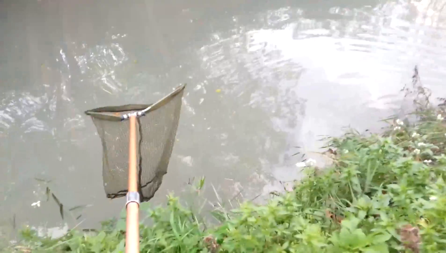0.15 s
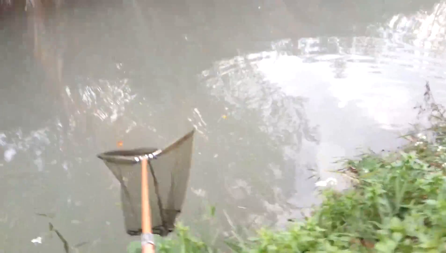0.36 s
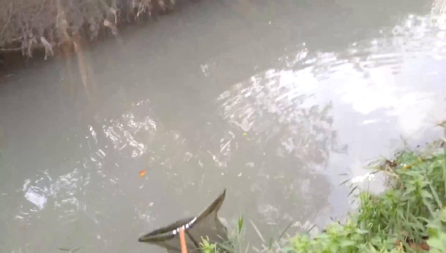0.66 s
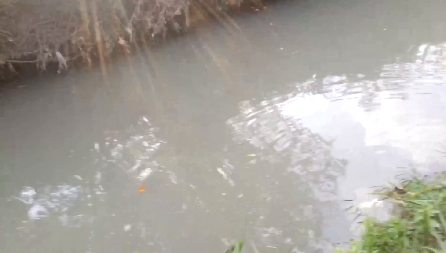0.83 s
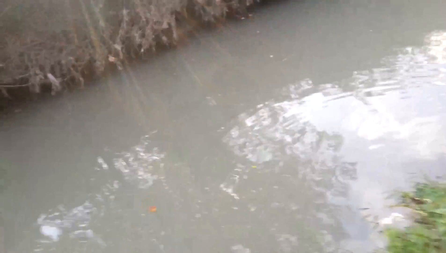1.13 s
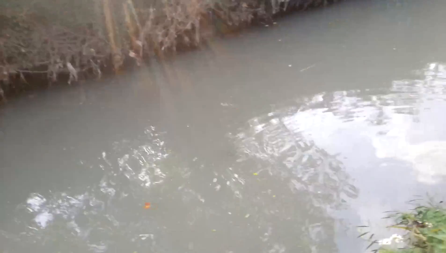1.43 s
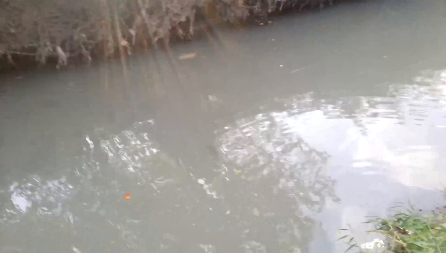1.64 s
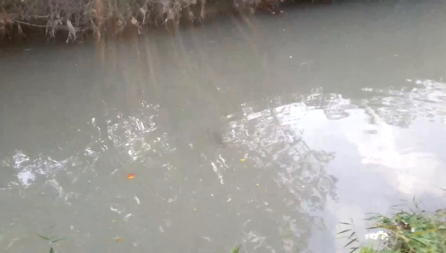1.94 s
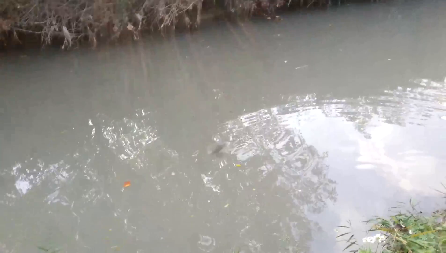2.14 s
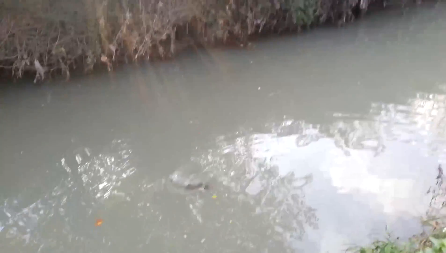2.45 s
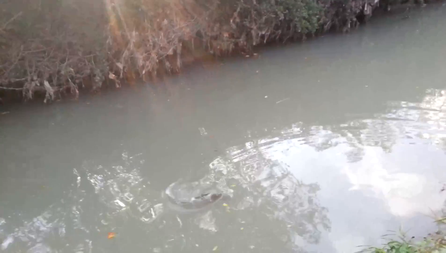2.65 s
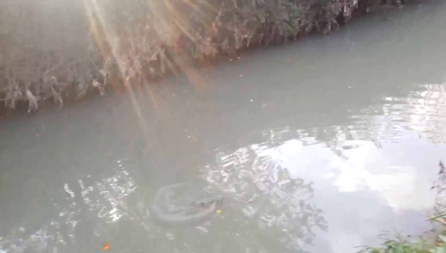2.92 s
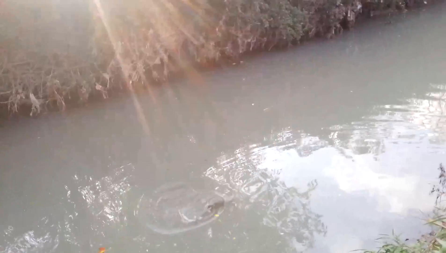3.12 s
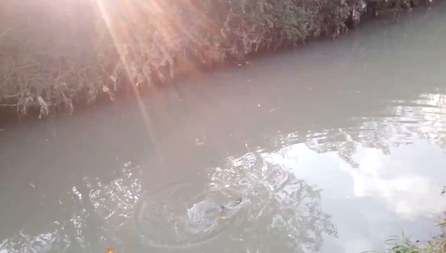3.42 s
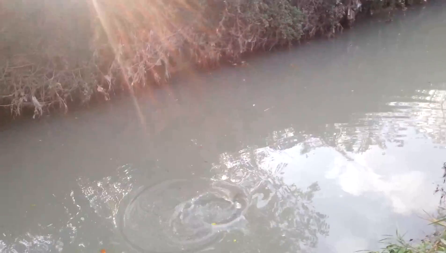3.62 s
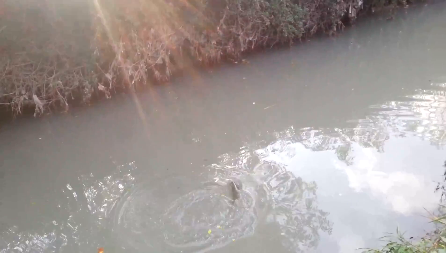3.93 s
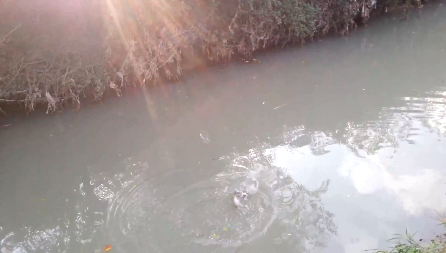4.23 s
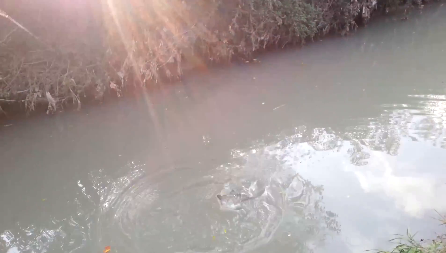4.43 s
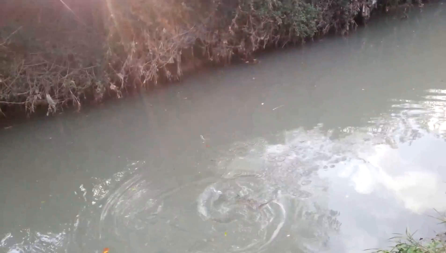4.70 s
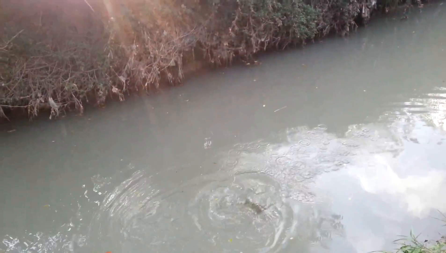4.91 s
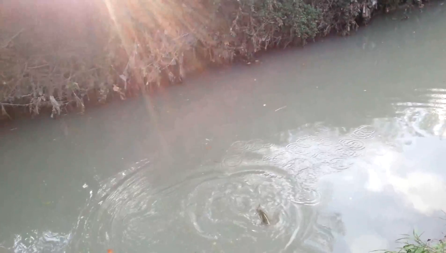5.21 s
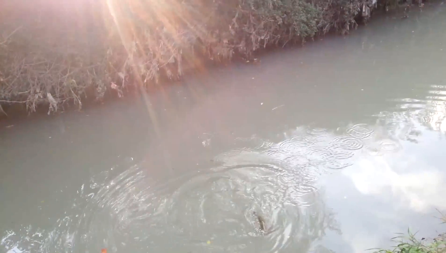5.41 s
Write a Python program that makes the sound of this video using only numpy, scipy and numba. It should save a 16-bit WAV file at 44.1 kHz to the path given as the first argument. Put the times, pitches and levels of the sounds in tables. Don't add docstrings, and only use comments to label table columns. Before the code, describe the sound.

Two sharp handle snaps and soft rustling on a canal bank, then a hooked fish thrashes at the surface with bubbly gurgles and hard splashes.

```python
import sys
import numpy as np
from scipy import signal
from scipy.fft import rfft, irfft, next_fast_len
from scipy.io import wavfile
from scipy.ndimage import uniform_filter1d
from numba import njit

SR = 44100
rng = np.random.default_rng(int(sys.argv[2]) if len(sys.argv) > 2 else 0)


def int16_out(signal):
    q = np.round(np.clip(np.atleast_2d(signal).T, -1, 1) * 32767)
    wavfile.write(sys.argv[1], SR, q.astype(np.int16))


def linear_from_db(decibels):
    return 10 ** (np.asarray(decibels, float) / 20)


N = 245195
PAD = next_fast_len(N, real=True)
FREQ = np.fft.rfftfreq(PAD, 1 / SR)
TIME = np.arange(N) / SR

# t left/s, t right/s
SNAP_TIMES = [
    (.35745, .35720),
    (.62693, .62717),
]


def fish():
    # t of the height/s, gurgle level/dB, spray level above the gurgle/dB
    lunges = [(2.39, -39, -7.5), (2.46, -39, -6), (2.57, -45.5, -3), (2.74, -52.5, -2.5),
              (2.85, -48.5, -16), (3.08, -48.5, -6.5), (3.22, -37, -10), (3.32, -38.5, -16.5),
              (3.41, -36, -9), (3.61, -35, -7.5), (3.7, -37, -17), (3.8, -50.5, -11), (4.05, -67, -12),
              (4.2, -50, 6.5), (4.25, -32.5, -13), (4.34, -37.5, -6.5), (4.42, -30.5, -18.5),
              (4.55, -32.5, -9), (4.68, -46, -7), (4.77, -46.5, -11)]
    gurgle_gain, spray_gain = surges(lunges, rise_db_s=182, fall_db_s=102, hold_s=0.0056)
    water = air_pockets() + slaps()
    water += gurgle_gain * gurgle() * linear_from_db(-4.0 + 1.0 * walk(60))
    fizz = [spray() for _ in range(3)]
    spray_gain = spray_gain * linear_from_db(2.0 * walk(70) - 1.0)
    water += 0.71 * spray_gain * fizz[0]
    return at_ports(water) + 1.324 * spray_gain * np.array(fizz[1:])


def air_pockets():
    # t/s, start f/Hz, end f/Hz, length/ms, peak level/dB
    climbs = [(2.404, 600, 800, 16, -33.5), (2.424, 850, 1250, 9, -39), (2.433, 399, 514, 29, -40),
              (2.4351, 522, 775, 63, -43.5), (2.756, 1320, 1420, 7, -30), (2.766, 1500, 1800, 9, -42),
              (3.1488, 987, 1270, 41, -36.5), (3.2027, 1200, 1415, 22, -32), (3.224, 1450, 2400, 17, -52),
              (3.3895, 494, 600, 8, -33), (3.3978, 740, 1080, 9, -27), (3.566, 563, 787, 25.6, -38),
              (3.7021, 511, 1366, 36, -39), (3.726, 1105, 1460, 14, -42), (3.76, 1700, 2380, 25, -40),
              (4.078, 1295, 1450, 14, -41), (4.091, 1460, 2340, 22, -45), (4.377, 1850, 1900, 6, -30.5),
              (4.415, 390, 910, 19, -39), (4.447, 566, 1443, 52, -36.5), (4.5257, 1670, 2000, 9.1, -22.5),
              (4.5437, 1080, 1380, 12.7, -30), (4.608, 1250, 3100, 6.5, -20), (4.975, 1850, 2250, 16, -53),
              (5.302, 1020, 1420, 9, -46), (5.344, 3250, 3200, 5, -50), (5.3249, 2220, 2300, 7.2, -35.5),
              (5.332, 2400, 3400, 7, -39.5)]
    # t/s, f/Hz, length/ms, peak level/dB
    plops = [(2.349, 1764, 10, -33.5), (2.3635, 1740, 5.9, -32), (2.3638, 1063, 10.6, -29.5),
             (2.4826, 1770, 5.7, -31), (2.5253, 1700, 9, -34), (2.5672, 674, 10, -35),
             (2.728, 1280, 8, -43), (2.843, 1200, 8.3, -48), (3.088, 1170, 56, -46),
             (3.1239, 1200, 12, -35), (3.2556, 1210, 8.2, -28.5), (3.2566, 447, 18, -38),
             (3.3285, 1150, 14, -40), (3.4113, 1840, 4.7, -29), (3.4132, 1200, 6.5, -31),
             (3.4242, 780, 9.6, -34), (3.465, 1660, 5.3, -27), (3.5769, 1290, 6.6, -33.5),
             (3.6228, 1710, 6.55, -21.5), (4.1826, 444, 12.2, -34), (4.2209, 1296, 4.6, -13.5),
             (4.2214, 573, 3.9, -15.5), (4.2267, 1263, 3.8, -11.5), (4.245, 740, 20, -35),
             (4.2803, 1820, 5.3, -24), (4.2846, 760, 13, -38), (4.5216, 1150, 16, -30),
             (4.5866, 1054, 13.5, -30.5), (4.7349, 1040, 1.5, -28), (4.808, 1055, 12, -42),
             (5.2781, 975, 12.4, -39.5)]
    # t/s, f/Hz, peak level/dB
    pings = [(2.4853, 2720, -33), (2.5617, 2290, -35), (2.605, 2040, -33), (3.1618, 2110, -28),
             (3.162, 2840, -26), (3.1898, 2930, -28), (3.506, 2350, -20), (3.515, 3260, -18.5),
             (3.5174, 1900, -27.5), (3.5365, 2230, -38.5), (3.6097, 2620, -20), (3.644, 2100, -26),
             (3.722, 2366, -32), (4.174, 2200, -32), (4.1874, 2920, -22), (4.21, 3240, -16),
             (4.2112, 2070, -23), (4.2655, 2200, -27), (4.328, 3370, -31), (3.274, 3270, -37),
             (3.279, 2270, -37), (3.294, 2800, -42), (3.323, 2110, -41), (3.123, 2920, -41),
             (3.136, 2800, -41), (3.235, 2280, -46), (4.362, 2620, -42), (4.341, 2400, -35),
             (4.45, 3100, -24), (4.4454, 2860, -27.5), (4.4767, 2900, -24.5), (4.4927, 2220, -25),
             (4.5237, 3180, -21), (4.5266, 2280, -13), (4.5364, 2720, -13.5), (4.6425, 2170, -32.5),
             (4.6092, 1960, -24), (4.662, 2270, -34), (4.759, 3220, -29)]
    # t/s, start f/Hz, end f/Hz, length/ms, peak
    # level/dB
    further_pockets = [(2.3519, 980, 940, 4.6, -33), (2.585, 960, 1360, 14.5, -44), (2.927, 2050, 1850, 10, -41),
                       (2.65, 1080, 1230, 40, -48), (2.855, 700, 720, 18, -47), (2.805, 1260, 1230, 23, -45.5),
                       (3.05, 2000, 3000, 9.7, -40), (2.953, 950, 1200, 11, -47), (3.262, 1750, 2200, 9, -35.5),
                       (3.218, 880, 1100, 14, -37), (3.327, 600, 700, 11.5, -38), (3.345, 1050, 1250, 8, -38),
                       (3.36, 1700, 1900, 6, -36), (3.6148, 647, 987, 26, -44), (3.7934, 1900, 1960, 9.7, -40),
                       (4.058, 910, 1200, 16, -48), (4.144, 1200, 2400, 7.5, -38), (4.1702, 1840, 1830, 7, -32),
                       (4.2875, 1110, 1150, 4, -26.5), (4.261, 1560, 2240, 11.4, -30.5),
                       (3.535, 1970, 2570, 8.8, -38), (4.181, 2800, 3180, 8, -25), (4.5365, 3200, 3430, 4, -24)]
    # t/s, start f/Hz, end f/Hz, length/ms, peak level/dB
    churn = [(2.384, 1900, 1950, 6.3, -35), (2.401, 2800, 2820, 5.8, -40), (2.448, 1400, 1450, 4.7, -40),
             (2.449, 2000, 2050, 5.5, -38), (2.468, 1800, 1860, 4.5, -40), (3.406, 2270, 2350, 4.4, -32),
             (3.455, 1700, 1750, 6.9, -45), (3.528, 2050, 2080, 6, -36), (3.572, 1800, 1800, 5.7, -34),
             (3.58, 2090, 2150, 7.5, -36), (3.582, 704, 990, 16, -35), (3.828, 1750, 1700, 7.8, -41.5),
             (3.832, 1150, 1100, 7.6, -50), (3.943, 2120, 2080, 8.1, -49), (3.971, 1150, 1130, 8.9, -46),
             (4.06, 2150, 2150, 6.5, -45), (4.329, 2000, 1970, 8.1, -35), (4.349, 1310, 1350, 8, -30),
             (4.365, 1200, 1250, 6, -30), (4.375, 267, 400, 40.6, -45), (4.25, 328, 380, 22, -43),
             (4.3925, 2200, 2230, 3.3, -30), (4.411, 2140, 2480, 5, -34), (4.421, 2190, 2270, 8, -32.5),
             (4.502, 1550, 1400, 3.8, -33), (4.508, 977, 1090, 10.4, -33.5), (4.552, 2400, 2500, 3.7, -29),
             (4.562, 2300, 2350, 5.3, -30), (4.569, 1110, 1150, 4.6, -28.5), (4.603, 2400, 2450, 3.3, -27),
             (4.624, 1800, 1850, 7.5, -34), (4.298, 1150, 1290, 16, -38), (4.316, 1090, 1300, 5.1, -35)]
    # t/s, peak level/dB, f/Hz
    spits = [(2.356, -33, 3700), (2.3846, -41, 5260), (2.509, -37, 4900), (2.583, -44, 4800),
             (2.629, -41, 3180), (3.123, -39, 3780), (3.1793, -35, 4320), (3.214, -32.5, 4450),
             (3.2722, -31.5, 4660), (3.3195, -42, 4380), (3.3415, -37, 5800), (3.415, -31, 4420),
             (3.415, -33, 5600), (3.4205, -35, 5400), (3.421, -35, 4470), (3.492, -37, 2900),
             (3.5146, -41, 4530), (3.5918, -28.5, 4520), (3.6133, -37, 4400), (3.646, -26, 4530),
             (3.797, -46, 2800), (4.185, -27, 4430), (4.21, -29, 3830), (4.381, -30.5, 3300),
             (4.4385, -35, 3500), (4.5265, -27, 6740), (4.5351, -19, 4550), (4.587, -23, 3920),
             (4.604, -31, 4360), (4.672, -34.5, 2880)]

    pockets = list(climbs) + list(further_pockets) + list(churn)
    pockets += [(s, hz, hz, ms, db) for s, hz, ms, db in plops]
    for s, hz, db in pings:
        ms = 1000 * 10.9 / hz * linear_from_db(0.51 * (-28 - db))
        pockets.append((s, hz, hz, ms, db))
    spit_cycles = 12
    pockets += [(s, hz, hz, 1000 * spit_cycles / hz, db) for s, db, hz in spits]

    out = np.zeros(N)
    for s, hz, end_hz, ms, db in pockets:
        wobble = rng.standard_normal(60)
        if end_hz < 1.12 * hz:
            note = linear_from_db(0.5) * bubble(hz, end_hz, ms, wobble, top=0.1, fall_db=8.5, over=2.5)
        else:
            note = bubble(hz, end_hz, ms, wobble)
        add(out, s, linear_from_db(db) * note)
    return out


def bubble(hz, end_hz, ms, wobble, top=0.18, fall_db=5.0, over=1.2):
    u = np.arange(int(over * ms * SR / 1000)) / (ms * SR / 1000)
    swell = np.sin(np.pi / 2 * np.minimum(u / top, 1)) ** 0.5
    fall = linear_from_db(-fall_db * np.maximum(u - top, 0) / (1 - top))
    fall = fall * np.minimum(8 * (over - u), 1)
    shake = np.interp(np.arange(len(u)), 100 * np.arange(len(wobble)), wobble)
    pitch = hz * (end_hz / hz) ** (np.minimum(u, 1.1) ** 1.4) * (1 + 0.022 * shake)
    return swell * fall * linear_from_db(2.6 * shake[::-1]) * np.sin(2 * np.pi * np.cumsum(pitch) / SR)


def slaps():
    # t/s, peak level/dB, centre f/Hz
    fin_slaps = [(2.426, -26, 2600), (3.1617, -14.5, 3130), (3.5149, -13, 3500), (4.2102, -20, 2800),
                 (4.2197, -38, 3500), (4.5244, -30, 3500), (3.1624, -16.5, 12900), (3.5117, -23, 9000),
                 (3.2745, -32, 6500), (4.233, -24, 1700), (4.236, -19, 1500)]
    # t/s, peak level/dB, centre f/Hz
    tail_strikes = [
        (3.2572, -14, 1300),
        (4.2214, -2, 1300),
        (4.5258, -6, 2300),
        (3.1608, -24, 12000),
        (4.5872, -7, 2800),
        (4.3925, -16, 2200),
        (4.411, -19, 2300),
        (3.1487, -24, 1500),
        (3.3185, -33, 1800),
    ]
    out = np.zeros(N)
    for hits, fade, foam in [(fin_slaps, 60.0, 1.0), (tail_strikes, 22.0, 0.3)]:
        for s, db, hz in hits:
            burst = foam * rng.standard_normal(400) * np.exp(-np.arange(400) / fade)
            burst[0] = 2.9
            edges_hz = [0.5 * hz, min(2.1 * hz, 16000)]
            band = signal.butter(3, edges_hz, "band", fs=SR, output="sos")
            crack = signal.sosfilt(band, burst)
            add(out, s, linear_from_db(db - 7.5) * crack / abs(crack).max())
    return out


def gurgle(count=5000):
    # f/Hz, level/dB
    bubble_sizes = [(150, -40), (380, -15.5), (700, -8), (1200, -1.5), (1800, 0), (2800, -1.5), (4000, 1.5),
                    (7000, 1)]
    when, small, cycles, glide, loud = rng.random((count, 5)).T
    start = (SR * (2.25 + 2.65 * when)).astype(np.int64)
    size = linear_from_db(-(3 + small) * np.log(loud + 0.03) + 5 * small)
    hz = 380 * 8.91 ** small
    bubbles = swarm(start, hz, 2.0 + 15.0 * cycles ** 1.72, 0.4 * glide ** 2.17, size)
    return colour(bubbles, bubble_sizes) * np.sqrt(2.65 * SR / N)


def spray():
    # f/Hz, level per Hz/dB
    spray_colour = [(900, -28), (2200, 6.5), (3500, 6.5), (4800, 2.5), (6500, -2), (9000, -3.5),
                    (12500, -9), (15000, -16)]
    drops = rng.standard_normal(N) + crackle(1200, 5.7)
    return colour(drops, spray_colour) * linear_from_db(0.91 * walk(40))


def at_ports(water):
    # f/Hz, left minus right level/dB, left leads by phase/rad
    ports_table = [(294, -2, 0.82), (1200, 1.5, 0.53), (1700, 6.5, 1), (2400, 6, 0.5), (2970, 9, 2),
                   (3500, 10, -3), (4080, -25, -1), (4730, -14, -2.5), (6100, 2, -2), (15600, -13, -1.5)]
    pan = linear_from_db(along(ports_table) / 2)
    lead = np.exp(0.5j * along(ports_table, column=2))
    ports = np.array([pan * lead, 1 / pan / lead]) * np.sqrt(2 / (pan ** 2 + pan ** -2.0))
    ports = ports / (1 + (160 / (FREQ + 1)) ** 3)
    scatter = rng.standard_normal((2, 3000)) * np.exp(-np.arange(3000) / 600.0) * linear_from_db(-47)
    return shape(water, ports * (1 + rfft(scatter, PAD)))


def gear():
    out = snaps() + ticks()
    thin = shape(out, 1 / (1 - 1j * 350 / (FREQ + 1)) ** 2)
    return np.where(abs(TIME - SNAP_TIMES[1][0]) < 0.05, out, thin)


def snaps():
    # f/Hz, time to fall 60 dB/ms, left level/dB, right level/dB
    snap_modes = [
        [(3080, 13.6, -8.5, -6.5), (3300, 26, -35, -15), (2720, 3.4, 7.5, 8), (3500, 3.4, -25, 2.5),
         (4150, 7.6, -31, -3.5), (2120, 2.9, 6, -1.5), (4400, 3.6, -16, -25), (8950, 2.8, -28, -21),
         (3180, 2.7, -11, -3)],
        [(3000, 3.44, 14, -21), (1150, 9.6, -4, -1.5), (2350, 3.4, 8.5, 11), (1900, 5.2, 1, 1.5),
         (675, 24, -59, -23), (118, 2.55, 7, -49), (4800, 1.65, 8.5, -34), (7900, 1.8, 7, -35),
         (11600, 1.6, -0.5, -26)],
    ]
    out = np.zeros((2, N))
    for times, modes in zip(SNAP_TIMES, snap_modes):
        for side, s in enumerate(times):
            late = s - int(s * SR) / SR
            for hz, t60_ms, *db in modes:
                add(out[side], s, linear_from_db(db[side] + 1.0) * ring(hz, t60_ms, 0.75, late))
    return out


def ticks():
    # t/s, peak level/dB, ring f/Hz, treble level/dB, thud level/dB
    tick_table = [(0.037, -34, 2200, -2.5, -11), (0.2866, -23, 2680, -11, -8), (0.386, -33, 2720, -12, -25),
                  (0.4266, -34.5, 2330, -11, -9), (0.4427, -28, 3020, -1, -29),
                  (0.4601, -29, 2860, -2, -9.5), (0.928, -43, 8130, -12, -25),
                  (0.9768, -32.5, 7340, -24, -24), (0.978, -37, 2600, -20, -20),
                  (0.2905, -43, 3000, -20, -3), (1.005, -44, 2200, -15, -6), (1.061, -29, 2520, -36, -28),
                  (1.1081, -31, 2460, -26, -11), (1.1344, -48, 3300, -18, -21),
                  (1.3244, -32.5, 2350, -20, -19), (1.8125, -33, 1900, -4, -26),
                  (1.8142, -30.5, 2430, 1, -13), (1.8176, -32, 2900, -10, -7), (1.82, -29, 2600, 4, -14),
                  (1.8475, -40.5, 1840, 11, 4), (1.8967, -36, 2230, -9, -4), (0.409, -34, 4600, -17, -30),
                  (0.4636, -34, 2880, -12, -25), (0.4816, -38, 2780, -2, -22), (0.4885, -39, 3150, -4, -25),
                  (0.4912, -36.5, 5030, -13, -28), (0.513, -42, 2370, -13, -19),
                  (0.3617, -28, 3150, -30, -30), (0.6326, -30, 2800, -30, -20)]
    pan_db = -1.5
    treble = signal.butter(1, [5000, 11500], "band", fs=SR)
    out = np.zeros((2, N))
    for s, db, hz, treble_db, thud_db in tick_table:
        for side in range(2):
            jitter = 1 + 0.04 * rng.standard_normal(4)
            tick = ring(hz * jitter[0], 6.0, 0.2)
            add(tick, 0, 0.55 * ring(1.29 * hz * jitter[1], 5.2, 0.3))
            add(tick, 0, 0.5 * ring(0.64 * hz * jitter[2], 4.4, 0.96))
            scrape = rng.standard_normal(200) * np.exp(-np.arange(200) / 79.0)
            scrape = signal.lfilter(*treble, scrape)
            thud = ring(750.0 * jitter[3], 6.8, 0.47)
            add(out[side], s, linear_from_db(db + 10.5 + pan_db * (3.0 - side)) * tick)
            add(out[side], s, linear_from_db(db + treble_db + 4.5 + pan_db * (2.0 - side)) * scrape)
            add(out[side], s, linear_from_db(db + thud_db + 13.0) * thud)
    return out


def rustle():
    # t of the height/s, rub level/dB, hiss level above the rub/dB
    strokes = [(.08, -51, -8.5), (.22, -56.5, -17), (.375, -62, -10), (.41, -50.5, 0), (.47, -51, -5),
               (.7, -58.5, -8), (1.0, -50, -4.5), (1.06, -48.5, -1.5), (1.12, -43, -9), (1.24, -55, -5),
               (1.33, -49.5, -2.5), (1.43, -47.5, -5.5), (1.68, -53.5, -3.5), (1.755, -47.5, -14),
               (1.825, -52.5, -1), (1.97, -50, -3.5), (2.12, -53.5, -12), (2.29, -54, -1.5)]
    # f/Hz, level per Hz/dB
    rub_colour = [(140, -80), (400, -8), (900, -3.5), (1300, -9), (2400, 0), (4000, -3), (5200, -9),
                  (7000, -61), (12000, -58)]
    # f/Hz, level per Hz/dB
    hiss_colour = [(1200, -72), (3000, 7), (5000, 0), (8500, 1.5), (11500, -2.5), (14000, -4.5)]
    # t of the height/s, half length/s, level/dB
    zip_swell = (1.28, .08, -54)
    # f/Hz, level per Hz/dB
    zip_colour = [(10000, -40), (11000, -3), (11800, 2), (12800, -30)]

    grain = [rng.standard_normal(N) + 1.8 * crackle(900, 4.5) for _ in range(4)]
    when, pitch, loud = rng.random((4000, 3)).T
    start = (when * N).astype(np.int64)
    cycles, glide = np.full_like(when, 3.5), np.zeros_like(when)
    plucks = swarm(start, 1100 * 3.6 ** pitch, cycles, glide, linear_from_db(-4.0 * np.log(loud + 0.043)))
    grain[0] = grain[0] + 0.43 * grain[0].std() * plucks / plucks.std()

    flutter = linear_from_db(1.56 * walk(44.94))
    rub_left = colour(grain[0], rub_colour) * linear_from_db(3.0)
    rub_right = colour(grain[1] + 0.077 * grain[0], rub_colour) * linear_from_db(-1.5)
    rub = np.array([rub_left, rub_right])
    hiss = np.array([colour(g, hiss_colour) for g in grain[2:]]) * linear_from_db(3.0)
    zip_s, zip_half_s, zip_db = zip_swell
    zip_gain = linear_from_db(zip_db) * np.exp(-((TIME - zip_s) / zip_half_s) ** 2)
    cloth_zip = np.array([colour(g, zip_colour) for g in grain[:2]])
    rub_gain, hiss_gain = surges(strokes, rise_db_s=86, fall_db_s=90, hold_s=0.025)
    return flutter * (rub_gain * rub + hiss_gain * hiss + zip_gain * cloth_zip)


def hush():
    # f/Hz, level per Hz/dB
    hush_colour = [(25, -17), (60, -21), (120, -10), (224, -3), (394, 0), (690, -2.5), (1240, -5),
                   (1500, -6.5), (2100, -8.5), (3500, -8), (6000, -19), (12000, -19), (15000, -19)]
    # f/Hz, likeness/0-1
    likeness = [(60, 0), (300, 0.61), (700, 0.3), (1400, 0), (15000, 0.13)]
    like = np.clip(along(likeness), -0.9, 0.99)
    mid, side = (rfft(rng.standard_normal(PAD)) * linear_from_db(along(hush_colour)) for _ in range(2))
    shared, apart = mid * np.sqrt(1 + like), side * np.sqrt(1 - like)
    pair = np.array([shared + apart, shared - apart])
    out, swell = 0, walk(0.85)
    for octave in range(4, 15):
        band = np.maximum(1 - abs(np.log2(FREQ + 1) - octave), 0)
        out = out + irfft(pair * band, PAD)[:, :N] * linear_from_db(0.4 * swell + 0.8 * walk(6))
    return out * linear_from_db(-54.5 + 3.5) / np.sqrt(np.mean(out ** 2))


def breeze():
    # t/s, level/dB
    breeze_rise = [
        (3.0, -91),
        (5.56, -65.5),
    ]
    low = (FREQ / 60 / (1 + FREQ / 60)) ** 2 / (1 + (FREQ / 175) ** 4)
    air = shape(rng.standard_normal((2, N)), low)
    level_db = np.interp(TIME, *np.array(breeze_rise).T) + 2 * walk(6.17)
    return air / air.std() * linear_from_db(level_db)


@njit
def swarm(start, hz, cycles, glide, size):
    out = np.zeros(N)
    for k in range(len(hz)):
        length = int(2 * cycles[k] * SR / hz[k])
        phase = 0.0
        for i in range(min(length, N - start[k])):
            u = 2 * i / length
            phase += 2 * np.pi * hz[k] * (1 + glide[k] * u) / SR
            envelope = min(8 * u, 1.0) * np.exp(-2.3 * u) * min(3 * (2 - u), 1.0)
            out[start[k] + i] += size[k] * envelope * np.sin(phase)
    return out


def ring(hz, t60_ms, rise_ms, late=0.0):
    t = np.maximum(np.arange(int(t60_ms * SR / 1000) + 2) / SR - late, 0)
    build = 1 - np.exp(-1000 * t / rise_ms)
    return build * np.exp(-1000 * np.log(1000) * t / t60_ms) * np.sin(2 * np.pi * hz * t)


def crackle(rate, spread_db):
    out = np.zeros(N)
    when, sign, loud = rng.random((int(rate * N / SR), 3)).T
    out[(when * N).astype(int)] = np.sign(sign - 0.5) * linear_from_db(-spread_db * np.log(loud + 0.01))
    return out


def surges(table, rise_db_s, fall_db_s, hold_s):
    s, db, above_db = np.array(table, float).T[:, :, None]
    before, after = np.maximum(s - hold_s - TIME, 0), np.maximum(TIME - s - hold_s, 0)
    slope = db - rise_db_s * before - fall_db_s * after
    return [np.sqrt(np.sum(linear_from_db(d) ** 2, axis=0)) for d in (slope, slope + above_db)]


def walk(rate):
    k = int(SR / rate)
    steps = np.repeat(rng.standard_normal(N // k + 1), k)
    return 1.3 * uniform_filter1d(uniform_filter1d(steps, k), k)[:N]


def along(table, column=1):
    rows = np.array(table, float)
    return np.interp(np.log(FREQ + 1), np.log(rows[:, 0]), rows[:, column])


def shape(x, response):
    return irfft(rfft(x, PAD) * response, PAD)[..., :N]


def colour(x, table):
    y = shape(x, linear_from_db(along(table)))
    return y / np.sqrt(np.mean(y ** 2))


def add(out, s, grain):
    n = int(s * SR)
    out[n:n + len(grain)] += grain[:len(out) - n]


def scene():
    return fish() + rustle() + gear() + hush() + breeze()


def band_limit(x):
    return signal.sosfilt(signal.butter(12, 15810, fs=SR, output="sos"), x)


def record(dry):
    # start t/s, end t/s, share removed/0-1
    thinned = [
        (.292, .333, .65),
        (.333, .3545, .98),
        (.636, .652, .9),
        (3.147, 3.156, .5),
        (3.168, 3.1755, .92),
    ]
    share_lost = sum(share * ((TIME > a) & (TIME < b)) for a, b, share in thinned)
    treble = shape(dry, 1 / (1 + (5200 / (FREQ + 1)) ** 12))
    dry = dry - uniform_filter1d(share_lost, size=90) * treble
    shelf = linear_from_db(-31 / (1 + np.exp((14670 - FREQ) / 90.0)))
    mix = np.clip(shape(np.clip(dry, -1, 1), shelf), -1, 1)
    return band_limit(mix)


dry = scene()
out = record(dry)
int16_out(out)
```